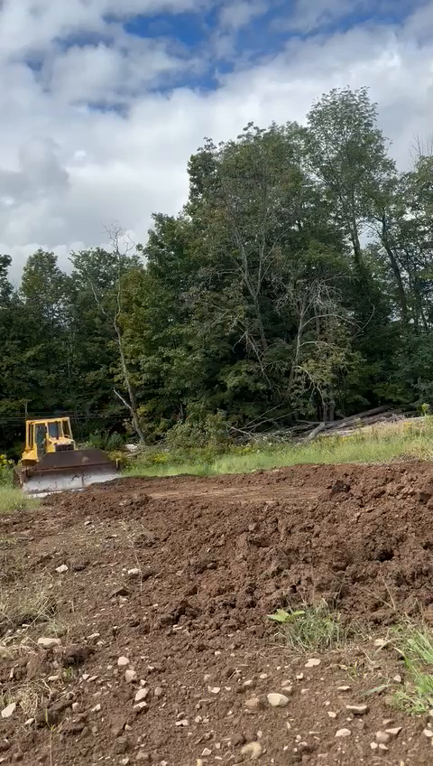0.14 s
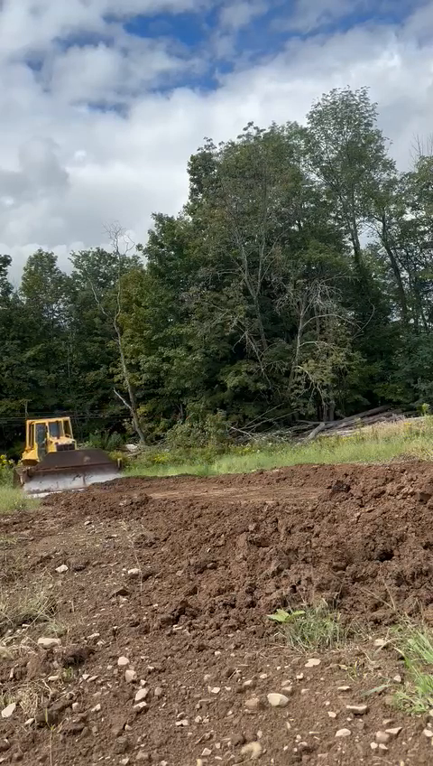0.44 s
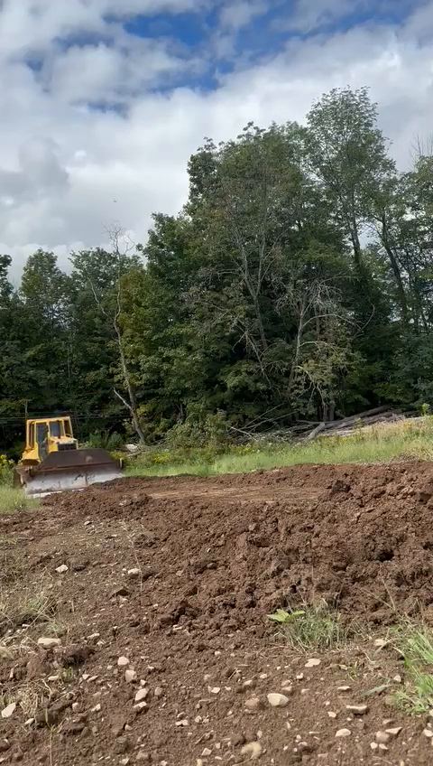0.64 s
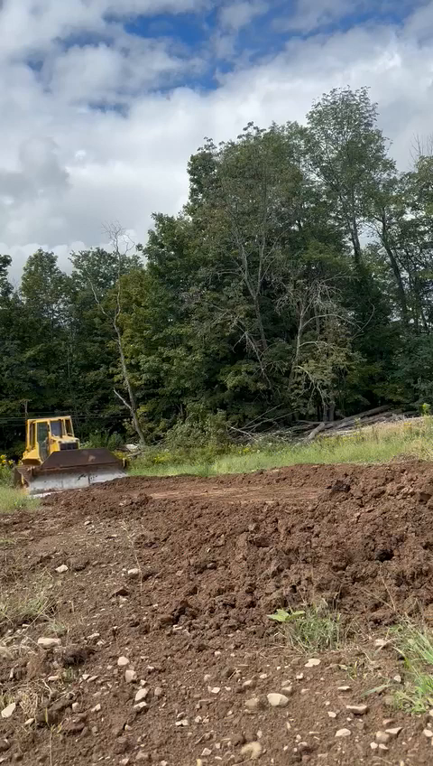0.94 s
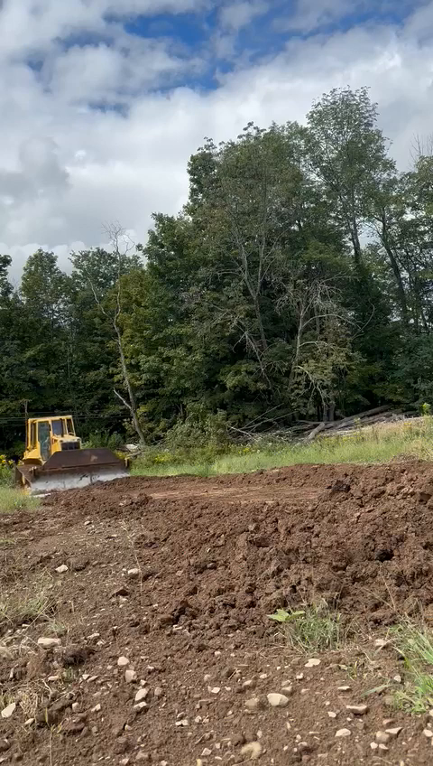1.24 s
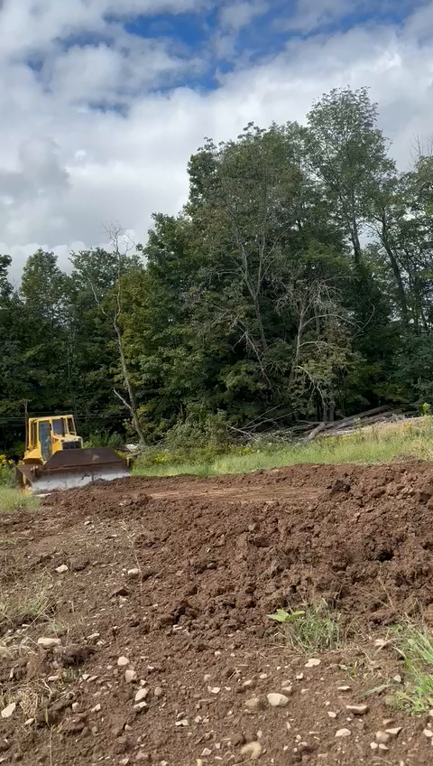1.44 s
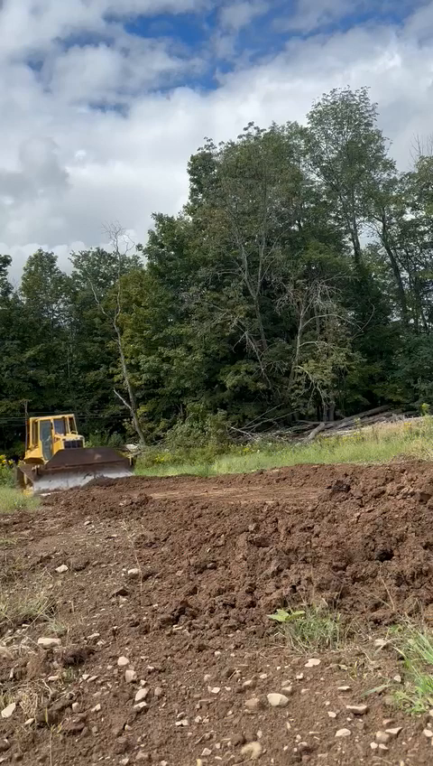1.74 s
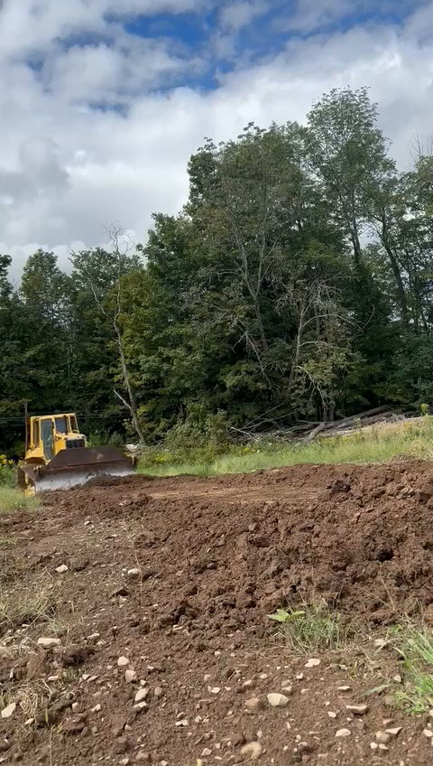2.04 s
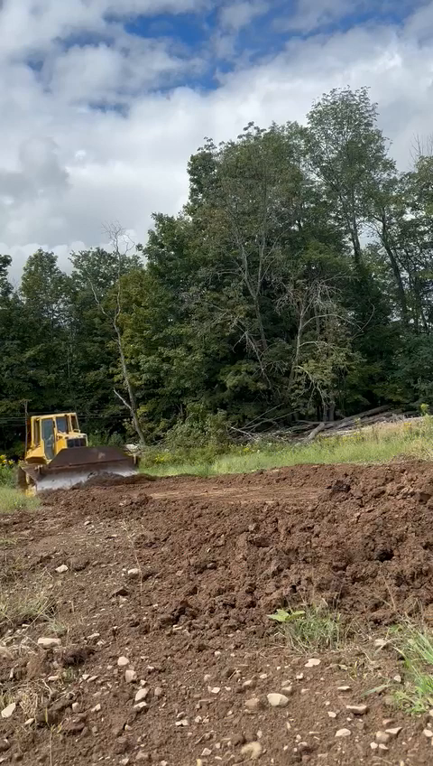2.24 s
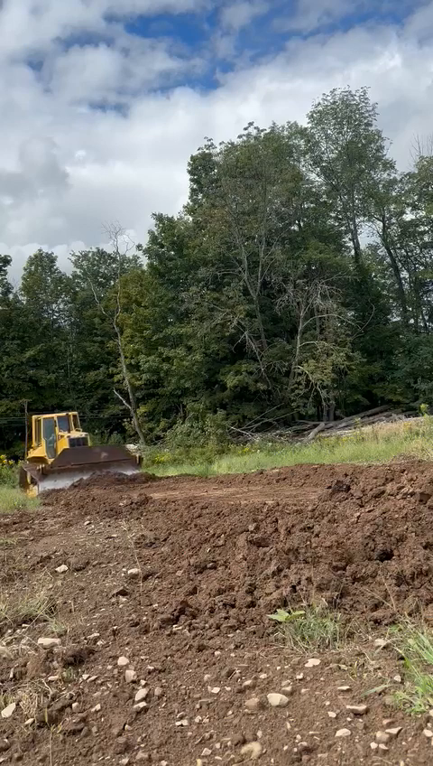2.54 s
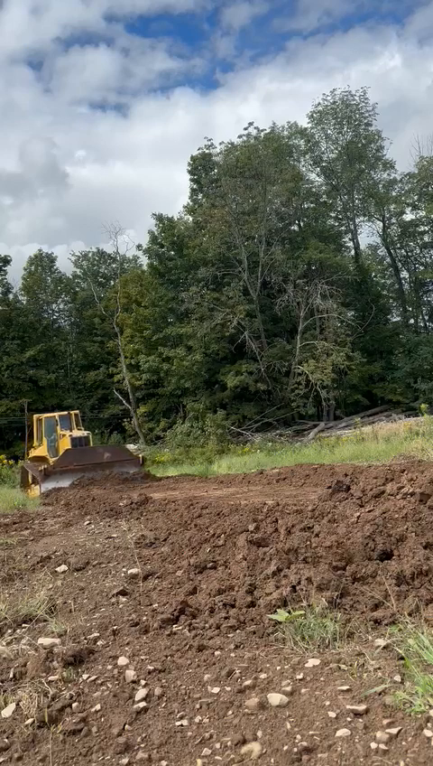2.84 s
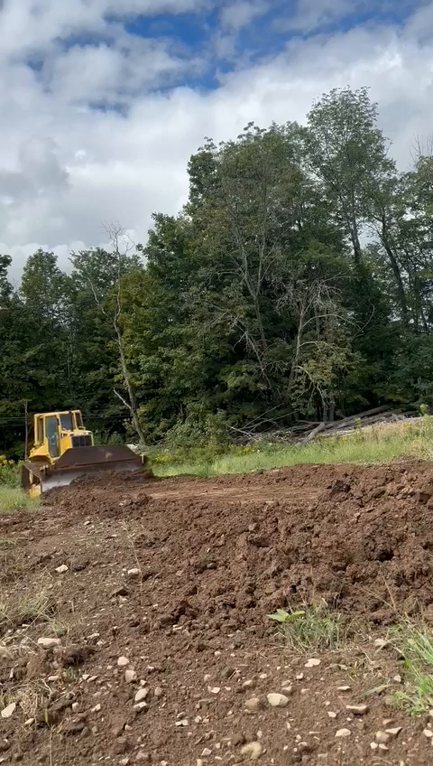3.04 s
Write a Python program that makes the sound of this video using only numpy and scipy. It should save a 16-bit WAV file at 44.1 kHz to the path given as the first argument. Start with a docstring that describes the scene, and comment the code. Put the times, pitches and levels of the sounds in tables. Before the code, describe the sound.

A diesel bulldozer pushes dirt, tracks clanking and squeaking, with insects hissing faintly.

```python
"""An open lot, where a crawler dozer pushes dirt some way off to the left, picking up speed.
The periodic firing of its six-cylinder diesel makes the exhaust drone and the block clatter.
Track shoes thump down five times a second, links clank, steel rings, and dry pins squeal by
stick-slip friction, echoed by the trees. Insects hiss steadily in the grass and trees around."""
import sys
import numpy as np
from scipy import signal
from scipy.fft import rfft, irfft
from scipy.io import wavfile

SR = 44100
rng = np.random.default_rng(int(sys.argv[2]) if len(sys.argv) > 2 else 0)


def waveform_to_disk(signal):
    """Save audio, clipped to [-1, 1], as 16-bit WAV at the path in sys.argv[1]."""
    frames = np.transpose(np.atleast_2d(signal))
    scaled = np.clip(frames, -1, 1) * 32767
    samples = np.round(scaled).astype(np.int16)
    wavfile.write(sys.argv[1], SR, samples)


N = 141120
T, HZ = np.arange(N) / SR, np.fft.rfftfreq(N, 1 / SR)

# Engine speed. Each row: time in seconds, firings per second.
FIRING_RATE = [(0, 73), (.3, 76.6), (.6, 83), (.9, 87.8), (1.2, 88.5), (1.5, 95.6), (1.8, 93.0),
               (2.1, 94.4), (2.5, 95.3), (3.2, 93)]
# Exhaust note, its third harmonic and the fan. Each row: time in seconds, level in dB.
DRONE_LEVEL = [(0, -28), (.26, -29), (.7, -34.5), (.95, -29.5), (1.3, -29), (2.1, -28.5), (2.5, -27),
               (3.2, -27)]
PIPE_LEVEL = [(0, -38), (.3, -36.5), (.56, -32.5), (.75, -34), (1.1, -36), (1.5, -43), (2.2, -46),
              (3.2, -43)]
FAN_LEVEL = [(0, -50.5), (1.2, -60), (1.5, -55.5), (2.0, -42), (2.4, -58), (3.2, -51)]
# Weaker partials. Each row: multiple of the cycle rate, relative dB at lowest and at highest speed.
ENGINE_PARTIALS = [(3, -56, -45), (9, -48, -42), (11, -42, -39), (12, -41, -37), (16, -52, -39),
                   (24, -46, -54), (32, -56, -45), (40, -56, -50), (47, -58, -51.5), (53, -57, -52),
                   (59, -60, -53), (81, -58, -53), (82, -60, -55), (115, -66, -59)]
# Knock strength. Each entry: one cylinder's relative level in dB.
CYLINDER_DB = [2.5, -2, 1.5, -2.5, 2.5, -1.5]

# Noise spectra. Each row: frequency in Hz, relative spectral density in dB.
CLATTER_SPECTRUM = [(150, -6), (300, -8), (380, -6.5), (520, 0.5), (680, 2.5), (850, -1.5), (1080, -6),
                    (1400, -7), (1700, -10.5), (2300, -13.5), (2700, -18.5), (3300, -22), (4200, -22.5),
                    (6000, -27.5), (8800, -62), (10000, -67)]
RUMBLE_SPECTRUM = [(15, -46.5), (30, -35), (45, -3.5), (70, 4), (110, 1), (160, -1), (230, -0.5),
                   (300, -3.5), (370, -14.5), (600, -31), (1500, -71), (8000, -81)]
THUMP_SPECTRUM = [(40, -24.5), (110, -6), (150, 2.5), (175, 3.5), (205, -10), (270, -19.5), (400, -18),
                  (1500, -28.5), (4000, -53), (9000, -95)]
RING_SPECTRUM = [(900, -30), (1050, 3), (1160, -27), (1290, 2), (1400, -6.5), (1500, -0.5), (1640, -17.5),
                 (2000, -66.5)]
INSECT_SPECTRUM = [(3500, -36), (4950, -22), (5200, 11.5), (5450, 10.5), (5900, 6), (6500, 2.5),
                   (7100, 7.5), (7800, 10), (8400, 5), (8600, 11.5), (8850, -1), (9300, -8), (10300, -55.5)]
# Noise envelopes. Each row: time in seconds, relative level in dB.
CLATTER_LEVEL = [(0, -38), (.7, -35), (1.5, -32.5), (2.4, -33.5), (3.2, -34)]
CLATTER_TREBLE_LEVEL = [(0, -1.5), (.8, -3), (1.6, -2.5), (2.4, 0), (3.2, 1.5)]
RUMBLE_LEVEL = [(0, -35), (.7, -34), (1.5, -31), (3.2, -33.5)]
RING_LEVEL = [(0, -44.5), (.2, -41), (.45, -45.5), (1, -46), (1.8, -47), (3.2, -58)]
INSECT_LEVEL = [(0, -48.5), (1.5, -48), (3.2, -45.5)]

# Track impacts. Each row: start in seconds, ringing frequency in Hz, level in dB.
SHOE_THUMPS = [(0.511, 151.2, -28.5), (0.737, 152, -27.5), (.98, 170, -30), (1.15, 150, -33.5),
               (1.30, 161.2, -33), (1.401, 161.7, -33), (1.587, 180.7, -24.5), (1.783, 167, -25),
               (1.998, 173.3, -24), (2.19, 177, -24.5), (2.411, 185, -25.5), (2.6, 187, -28.5),
               (2.798, 174, -24.5), (2.973, 164, -26)]
LINK_CLANKS = [(0.506, 514.5, -34.5), (0.801, 641, -33.5), (0.994, 657, -30), (1.221, 483, -30),
               (1.27, 700, -34.5), (1.592, 618, -31.5), (1.805, 553, -30.5), (2.084, 625.1, -30.5),
               (3.085, 684.8, -33.5)]
# Dry pins. Each row: start and length in seconds, first and last frequency in Hz,
# relative level in dB, octave in dB against the fundamental.
PIN_SQUEALS = [(.437, .04, 5300, 5280, -48, -24), (.553, .03, 5290, 5220, -48, -24),
               (.58, .29, 4720, 4690, -53, -14), (.755, .032, 4720, 4700, -47, -20),
               (1.15, .1, 4660, 4640, -52, -20), (1.24, .11, 4670, 4720, -49, -18),
               (1.345, .1, 4765, 4750, -43.5, -14), (1.447, .052, 4760, 4790, -41.5, -15),
               (1.503, .035, 4780, 4780, -45, -14), (1.553, .028, 4770, 4770, -46, -17),
               (1.64, .1, 4750, 4720, -54, -5), (1.738, .055, 4720, 4715, -42, -14),
               (1.797, .05, 4720, 4715, -43, -12), (1.88, .095, 4705, 4725, -41, -11),
               (1.958, .068, 5240, 5210, -32, -21), (1.985, .022, 4750, 4750, -45, -7),
               (2.017, .048, 5265, 5170, -39, -24), (2.018, .088, 4740, 4745, -40, -14),
               (2.06, .045, 5070, 5180, -44, -18), (2.098, .048, 5235, 5150, -37, -18),
               (2.11, .13, 4750, 4750, -50, -10), (2.14, .135, 5200, 5100, -51, -22),
               (2.655, .06, 4800, 4800, -43, -17), (2.724, .044, 4760, 4810, -45.5, -14),
               (2.78, .09, 4805, 4790, -42.5, -14), (2.865, .032, 4780, 4780, -38, -13),
               (2.895, .092, 4785, 4760, -38.5, -17), (3.012, .04, 4810, 4810, -48.5, -14),
               (3.063, .065, 4815, 4810, -46.5, -15)]
# Short falling squeaks. Each row: start in seconds, relative level in dB.
PIN_CHIRPS = [(.025, -52), (.062, -49.5), (.103, -53), (.145, -53), (.498, -53), (.532, -49.5), (.571, -48),
              (.624, -50.5), (2.33, -54), (2.367, -54), (2.405, -54)]

# Likeness of the two channels. Each row: frequency in Hz, coherence from 0 to 1.
DOZER_COHERENCE = [(30, 1), (100, .9998), (150, .985), (230, .965), (350, .93), (1100, .92), (1600, .97),
                   (2000, .99), (2400, .97), (2700, .7), (3600, .76), (4300, .86), (5500, .98), (6800, .98),
                   (8000, .7)]
INSECT_COHERENCE = [(5000, .995), (6900, .995), (7500, .87), (8200, .72), (8700, .65), (9100, .3)]
# Level difference. Each row: frequency in Hz, left minus right in dB.
DOZER_BALANCE = [(30, 0), (130, -.2), (330, -.5), (470, .3), (640, 2.8), (870, 5.2), (1200, 4.3),
                 (1600, 2.3), (2400, .6), (2750, 6), (3150, 8), (3900, 2.1), (4500, .6), (9000, 0)]
SQUEAL_BALANCE = [(4700, 4), (4850, 2), (5200, 5.5), (9400, 0)]
# Phase difference. Each row: frequency in Hz, lead of the left channel in radians.
DOZER_PHASE = [(80, 0), (145, .05), (230, .14), (340, .27), (470, .74), (640, 1.05), (870, .8), (1200, .38),
               (1600, .09), (2450, .03), (2750, .65), (3200, .2), (3900, -.16), (4500, -.35)]
SQUEAL_PHASE = [(4500, -.6), (4700, -1.4), (4850, -1.9), (5050, .6), (5250, .1), (9400, -1.6),
                (10400, -2.1)]
INSECT_PHASE = [(7000, 0), (7900, -.58), (8600, -1)]


def exhaust_and_fan(firings, speed):
    """Periodic firing gives a line spectrum; the third harmonic rises through a pipe resonance."""
    def partial(multiple):
        return np.sqrt(2) * np.sin(2 * np.pi * (multiple * firings + rng.random()))
    roughness, rough_hz, fan_ratio = .3, 24, 4.21
    speed_share = (speed - speed.min()) / np.ptp(speed)
    third = partial(3) * (1 + roughness * drift(rough_hz))
    third += partial(3) * roughness * drift(rough_hz)
    out = amp(curve(DRONE_LEVEL) + .61 * drift(5)) * partial(.99)
    out += amp(curve(PIPE_LEVEL) + .93 * drift(1.3)) * third
    for order, slow_db, fast_db in ENGINE_PARTIALS:
        level_db = slow_db + (fast_db - slow_db) * speed_share - 1.5
        waver_db = 2.5 * drift(1.6)
        out += amp(level_db + waver_db) * partial(order / len(CYLINDER_DB))
    return out + amp(curve(FAN_LEVEL)) * partial(fan_ratio)


def block_clatter(firings):
    """Impulsive excitation: each firing knocks the block, and part of the noise repeats every cycle."""
    decay_firings, floor, repeat_share, split_hz = .23, .95, .56, 1000
    cylinders = len(CYLINDER_DB)
    strength = amp(CYLINDER_DB)[firings.astype(int) % cylinders]
    knock = strength * np.exp(-(firings % 1) / decay_firings) + floor
    cycle = rng.standard_normal(2048)
    periodic = np.interp(firings / cylinders, np.arange(len(cycle)) / len(cycle), cycle, period=1)
    fresh, apart = rng.standard_normal((2, N))
    common = np.sqrt(repeat_share) * colour(knock * periodic, CLATTER_SPECTRUM)
    common += np.sqrt(1 - repeat_share) * colour(knock * fresh, CLATTER_SPECTRUM)
    both = spread(common, colour(knock * apart, CLATTER_SPECTRUM), DOZER_COHERENCE)
    low = lowpass(both, split_hz)
    treble = (both - low) * amp(curve(CLATTER_TREBLE_LEVEL))
    return (low * amp(drift(8.5)) + treble) * amp(curve(CLATTER_LEVEL))


def tracks():
    """Impacts excite damped vibrations in shoes and links, over the rumble of tracks grinding dirt."""
    rumble = colour(rng.standard_normal((2, N)), RUMBLE_SPECTRUM)
    common, apart = rumble * amp(curve(RUMBLE_LEVEL) + 1.7 * drift(19))
    dirt = colour(rng.standard_normal(N), THUMP_SPECTRUM)
    waver_hz = 20 * drift(89)
    def tone(hz):
        return unit(np.sin(phase_of(hz + waver_hz)))
    for start, hz, db in SHOE_THUMPS:
        common += amp(db) * impact(start, rise_s=.022, t60_s=.4) * (.5 * tone(hz) + .85 * dirt)
    for start, hz, db in LINK_CLANKS:
        common += amp(db) * impact(start, rise_s=.011, t60_s=.19) * tone(hz)
    return spread(common, apart, DOZER_COHERENCE)


def steel_ring():
    """Scraping drives the resonances of the running gear, most while the machine is still slow."""
    return colour(rng.standard_normal(N), RING_SPECTRUM) * amp(curve(RING_LEVEL))


def pin_squeals():
    """Stick-slip friction sustains unsteady high tones with a weak octave, and quick falling chirps."""
    chirp_s, chirp_top_hz, chirp_end_hz = .02, 4880, 4500
    fade_share, flutter_db = .24, 4
    chirps = [(start, chirp_s, chirp_top_hz, chirp_end_hz, db, -np.inf) for start, db in PIN_CHIRPS]
    jitter_hz = 22 * drift(170)
    flutter = amp(flutter_db * np.tanh(drift(110)))
    out = np.zeros(N)
    for start, length, from_hz, to_hz, db, octave_db in PIN_SQUEALS + chirps:
        on = (T >= start) & (T < start + length)
        age = T[on] - start
        phase = phase_of(from_hz + (to_hz - from_hz) * age / length + jitter_hz[on])
        tone = np.sin(phase) + amp(octave_db) * np.sin(2 * phase)
        ramp = np.clip(np.minimum(age, length - age) / (fade_share * length), 0, 1)
        out[on] += amp(db) * np.sin(np.pi / 2 * ramp) * unit(flutter[on] * tone)
    return amp(2) * out


def tree_echo(x, level_db=-7, t60_s=.2):
    """Scattering by the trees returns a short decaying tail, different in each channel."""
    tail = rng.standard_normal((2, SR // 2)) * np.exp(-np.log(1000) * T[:SR // 2] / t60_s)
    tail /= np.linalg.norm(tail[0])
    return amp(level_db) * signal.fftconvolve(x[None], tail, axes=1)[:, :N]


def insects(pulse_hz=75, pulse_depth=.12):
    """Incoherent summation merges many crickets and katydids into a finely pulsing hiss."""
    pulse = np.sin(phase_of(pulse_hz * (1 + .17 * drift(15.3))))
    common, apart = colour(rng.standard_normal((2, N)), INSECT_SPECTRUM) * (1 + pulse_depth * pulse)
    chorus = place(spread(common, apart, INSECT_COHERENCE), 0, spectrum(INSECT_PHASE))
    return chorus * amp(curve(INSECT_LEVEL) + 1.1 * drift(18))


def amp(db):
    """Decibels to amplitude ratio."""
    return 10 ** (np.asarray(db) / 20)


def unit(x):
    """Normalisation to rms 1."""
    return x / np.sqrt(np.mean(abs(x) ** 2) + 1e-20)


def phase_of(hz):
    """Phase in radians is the time integral of angular frequency."""
    return 2 * np.pi * np.cumsum(hz) / SR


def curve(points):
    """Linear interpolation of a table over time."""
    return np.interp(T, *np.transpose(points))


def spectrum(points):
    """Interpolation of a table over log frequency."""
    hz, value = np.transpose(points)
    return np.interp(np.log(HZ + 1), np.log(hz + 1), value)


def colour(x, points):
    """Spectral shaping by a dB table, scaled to rms 1."""
    return unit(irfft(rfft(x) * amp(spectrum(points)), N))


def lowpass(x, cutoff_hz):
    """Zero-phase filtering, falling 24 dB an octave above the cutoff."""
    return irfft(rfft(x) / (1 + (HZ / cutoff_hz) ** 4), N)


def drift(rate_hz):
    """Low-passed noise gives a random fluctuation of rms 1."""
    return unit(lowpass(rng.standard_normal(N), rate_hz))


def impact(start, rise_s, t60_s):
    """Envelope of a damped vibration: linear rise, exponential decay."""
    age = np.maximum(T - start, 0)
    return np.minimum(age / rise_s, 1) * np.exp(-np.log(1000) * np.maximum(age - rise_s, 0) / t60_s)


def spread(common, apart, coherence_table):
    """Sum and difference of two unrelated sounds give partly coherent channels."""
    coherence = spectrum(coherence_table)
    mid = rfft(common) * np.sqrt((1 + coherence) / 2)
    side = rfft(apart) * np.sqrt((1 - coherence) / 2)
    return irfft(np.array([mid + side, mid - side]), N)


def place(x, balance_db, lead_radians):
    """Level and phase differences between the channels convey direction."""
    half = amp(balance_db / 2) * np.exp(.5j * lead_radians)
    return irfft(rfft(x) * np.array([half, 1 / half]), N)


def scene():
    """Superposition of the dozer to the left and the insects all around."""
    speed = curve(FIRING_RATE)
    firings = np.cumsum(speed * (1 + .001189 * drift(6))) / SR  # running count
    dozer = exhaust_and_fan(firings, speed) + block_clatter(firings) + tracks() + steel_ring()
    dozer = place(dozer, spectrum(DOZER_BALANCE), spectrum(DOZER_PHASE))
    squeals = pin_squeals()
    direct_squeals = place(squeals, spectrum(SQUEAL_BALANCE), spectrum(SQUEAL_PHASE))
    return dozer + direct_squeals + tree_echo(squeals) + insects()


def record(dry):
    """Band limiting: a steep low-pass filter removes the highest treble."""
    cutoff_hz = 10450
    taps = signal.firwin(511, cutoff_hz, window=("kaiser", 9), fs=SR)
    return signal.oaconvolve(dry, taps[None], "same")


dry = scene()
out = record(dry)
waveform_to_disk(out)
```